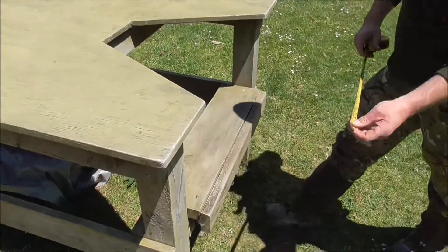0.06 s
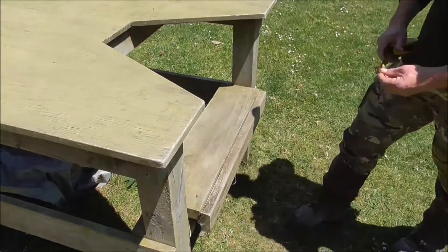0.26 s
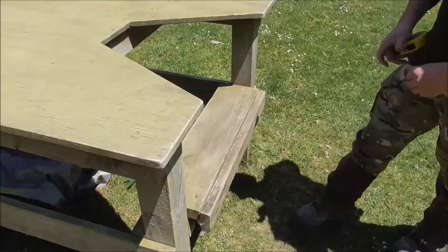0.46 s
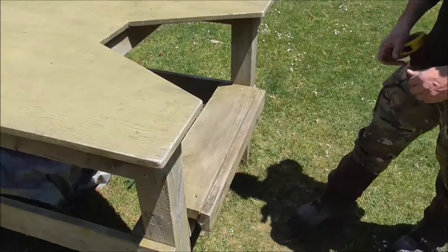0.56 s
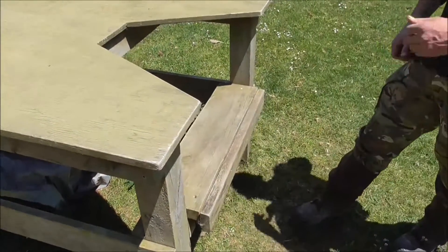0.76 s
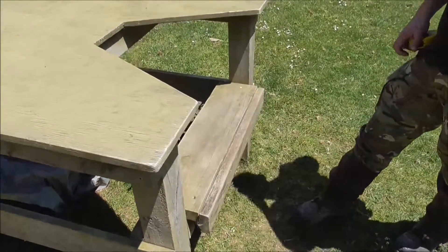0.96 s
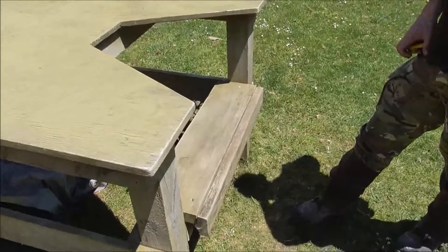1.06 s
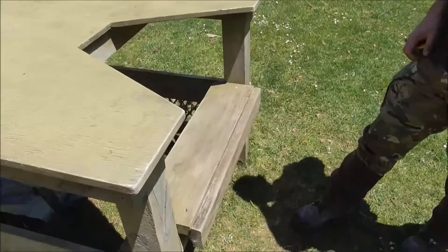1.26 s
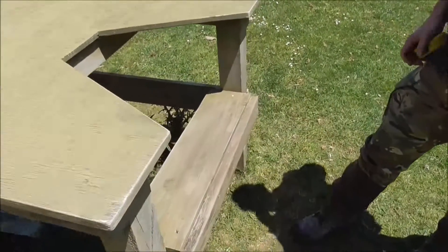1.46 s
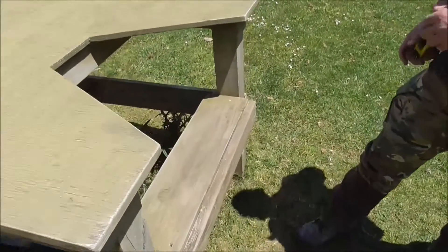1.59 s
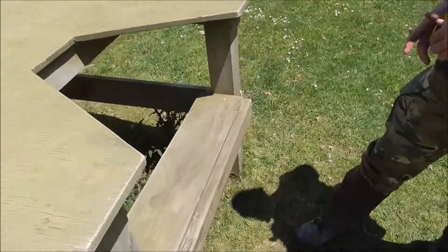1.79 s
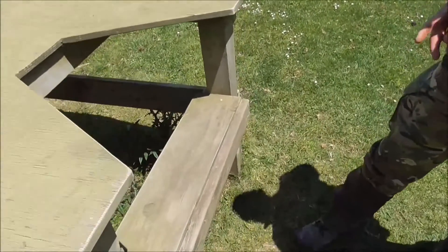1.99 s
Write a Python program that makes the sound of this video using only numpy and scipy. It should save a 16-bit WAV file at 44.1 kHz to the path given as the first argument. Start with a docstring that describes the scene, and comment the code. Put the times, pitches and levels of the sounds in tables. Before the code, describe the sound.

A steel tape measure runs back into its plastic case with gritty hiss and a hollow spool drone, slapping at 0.2 and 0.43 seconds, then snapping home brightly at 0.54. Small dry creaks and clicks of the case follow until about 1.2, then sparse nail clicks, a scuff near 1.9 and faint sleeve rustle. Outdoor wind rumbles and buffets the microphone throughout, stronger after 1.2 seconds, over soft hiss.

```python
"""Gusty wind rumbles and burbles on the microphone outdoors, its main push opposite in the two channels.
A steel tape measure runs back into its plastic case: gritty noise hisses in the slot, resonant noise drones
as the spool, and bursts with ringing modes slap and clack the hook home. Then short noise bursts creak,
click and scuff the case in the hand, and sleeves rustle faintly. A soft outdoor hiss lies underneath."""
import sys
import numpy as np
from scipy import signal
from scipy.fft import rfft, irfft, next_fast_len
from scipy.io import wavfile
from scipy.ndimage import map_coordinates

SR = 44100
rng = np.random.default_rng(int(sys.argv[2]) if len(sys.argv) > 2 else 0)


def int16_out(signal):
    """Quantize to a 16-bit WAV file."""
    q = np.round(np.clip(np.atleast_2d(signal).T, -1, 1) * 32767)
    wavfile.write(sys.argv[1], SR, q.astype(np.int16))


N = 89611
TIME = np.arange(N) / SR  # seconds

# Wind strength. Each row: time in seconds, level in dB.
WIND_LEVEL = [(0, -36), (.08, -41), (.16, -22.5), (.25, -28.5), (.42, -28.5), (.52, -27.5), (.63, -35),
              (.76, -31.5), (.9, -31), (.97, -24.5), (1.06, -22.5), (1.12, -31.5), (1.19, -21.5),
              (1.3, -24.5), (1.41, -20.5), (1.6, -22.5), (1.68, -28), (1.8, -21.5), (2.03, -18)]
# Single buffets. Each row: centre in seconds, level in dB, half width in seconds,
# burble in dB relative to the buffet.
BUFFETS = [(0.275, -20.5, 0.0051, -13), (0.31, -21, 0.0053, -25), (.70, -23.5, 0.0075, -27.5),
           (0.789, -21, .016, -12), (1.157, -26.5, 0.005, -4), (1.27, -18.5, 0.0071, -5),
           (1.325, -19, 0.0076, -7.5), (1.391, -17.5, 0.011, -16), (1.602, -17.5, 0.0046, -18),
           (1.642, -35.5, 0.0037, 8.5), (1.743, -20, 0.01, -10.5), (1.788, -18, 0.0072, -8.5),
           (1.835, -16.5, 0.006, -9.5), (1.951, -15.5, 0.0037, -1), (2.003, -17.5, 0.0081, -4.5)]
# Spectrum of the low rumble. Each row: frequency in Hz, level in dB.
RUMBLE_COLOUR = [(25, -29), (50, -11), (80, -2.5), (130, 1.5), (190, -2), (280, -10), (450, -20),
                 (750, -31), (1100, -50.5), (1800, -72.5), (4000, -89)]
# Spectrum of the higher burble. Each row: frequency in Hz, level in dB.
BURBLE_COLOUR = [(150, -13), (330, 13), (520, 6), (800, -1.5), (1150, -17), (1700, -44), (4000, -67)]
# Hollow bumps at the microphone. Each row: start in seconds, level in dB, relative low thump in dB.
BUMPS = [(1.2185, -22.5, -13), (1.2542, -16.5, 12.5)]
# Upper modes of a bump. Each row: frequency in Hz, relative level in dB, 60 dB decay in seconds.
BUMP_RING = [(626, 9.5, 0.03), (797, 0.5, 0.061)]
# Low modes of a bump. Each row: frequency in Hz, relative level in dB, 60 dB decay in seconds.
BUMP_THUMP = [(144, 1.5, 0.083), (196, 1.5, 0.074)]
WIND_LEFT_DB, WIND_APART_DB = -5, -15  # left channel's share; unshared turbulence in each channel
FLUTTER_DB, FLUTTER_PER_S = 1.5, 44.53
BURBLE_DB, BURBLE_FLUTTER_DB, BURBLE_FLUTTER_PER_S = -18, 8, 70
BUMP_RISE_S = 0.0027

# Spectrum of the outdoor hiss. Each row: frequency in Hz, level in dB.
AIR_COLOUR = [(300, -18.5), (1000, 4), (2100, -16), (3000, -14), (4600, -18.5), (6700, -21), (10000, -19),
              (16000, -16.5)]
AIR_DB = -63

# Blade rubbing in the slot. Each row: time in seconds, level in dB.
BLADE_LEVEL = [(0, -59.5), (.05, -51), (.135, -42.5), (.183, -46.5), (.22, -42), (.28, -43), (.312, -44),
               (.336, -29), (.365, -41.5), (.42, -43), (.445, -37.5), (.465, -48.5), (.527, -42.5),
               (.556, -47), (.585, -54.5), (.635, -75)]
# Spectrum of the rubbing. Each row: frequency in Hz, level in dB.
BLADE_COLOUR = [(400, -10.5), (900, -1.5), (1400, -9), (2150, -4), (2800, -4.5), (3600, -4), (4600, 0.5),
                (5700, -9.5), (7400, -11.5), (8250, -0.5), (10300, 2), (11500, -2), (13500, -10),
                (16000, -26)]
# The turning spool. Each row: time in seconds, level in dB.
SPOOL_LEVEL = [(0, -62.5), (.12, -55), (.18, -47), (.36, -43), (.46, -43.5), (.51, -62.5), (.585, -45),
               (.63, -63)]
# Resonances of the drone. Each row: frequency in Hz, width in Hz, relative level in dB.
SPOOL_MODES = [(482, 95, -4), (542, 67, 7), (724, 110, -6), (900, 150, -12.5), (1150, 120, -13)]
GRIT_PER_S, GRIT_DB = 280, -15
GRAIN_T60_S, GRAIN_SIZE_DB = .004, 3.5  # decay and random spread of the grains
SPOOL_WANDER, SPOOL_WANDER_PER_S = .025, 35  # speed spread as a fraction; curve knots a second

# Sleeve rustle. Each row: time in seconds, level in dB.
CLOTH_LEVEL = [(0, -76), (1.0, -69.5), (1.17, -66), (1.25, -70.5), (1.44, -65.5), (1.58, -59.5),
               (1.65, -59.5), (1.71, -57), (1.88, -57.5), (2.03, -55)]
# Spectrum of the rustle. Each row: frequency in Hz, level in dB.
CLOTH_COLOUR = [(700, 0), (1500, -7), (2200, -8), (2900, -17), (4000, -9), (6300, -16), (9000, -7),
                (11500, -7.5), (16000, -37)]
SNAG_PER_S, SNAG_DB = 70, -7.5

# Blade slaps, then the hook striking the case. Each row: start in seconds, level in dB,
# relative low body in dB, 60 dB decay in seconds.
CLACKS = [(0.0895, -35, -8, 0.044), (0.1946, -17, -9, .012), (0.198, -21, -13.5, 0.034),
          (0.4329, -26, -8, .025), (0.4377, -26, -8.5, .025), (0.536, -30.5, 6.5, .02),
          (0.5395, -9.5, -15.5, .017), (0.5424, -17, -2.5, 0.022)]
# Modes of the steel. Each row: frequency in Hz, relative level in dB, 60 dB decay in seconds.
STEEL_MODES = [(3390, -14, 0.039), (4730, -6, 0.037), (5230, -14, 0.032), (6500, -11.5, 0.029),
               (8360, -18, .022), (8530, 1.5, .022), (9720, -23, 0.011), (9800, 3, 0.018),
               (10600, -17.5, 0.036), (11240, 2.5, .02), (12100, -13.5, .02)]
# Spectrum of the bright crack. Each row: frequency in Hz, level in dB.
CRACK_COLOUR = [(1000, -30.5), (3000, -25.5), (5000, -6), (7400, -12), (8200, -1.5), (10500, 2.5),
                (12500, -11.5), (14000, -14.5), (16000, -28)]
# Spectrum of the duller plastic rattle. Each row: frequency in Hz, level in dB.
BODY_COLOUR = [(150, -9), (500, -0.5), (950, 1), (1400, -3.5), (2100, 0.5), (3000, -1.5), (4600, 4.5),
               (5600, -7.5), (6800, -15), (12000, -32.5)]
# Modes of the whole case. Each row: frequency in Hz, relative level in dB, 60 dB decay in seconds.
CASE_MODES = [(290, -4, 0.031), (530, 5, 0.037), (730, -5.5, 0.032), (830, -8.5, .022), (880, -7, 0.036),
              (1163, -2.5, .025), (1720, -17, 0.044), (2170, -6.5, .02), (2240, -2, .02)]
STOP_S, STOP_DB = .5460, -28.5  # the stop knocks the whole case
RING_DB, CRACK_DB, CLACK_RISE_S = -3, -1.5, 0.00033

# The case rattling and creaking in the hand. Each row: start in seconds, level in dB,
# relative upper middle in dB, relative treble in dB.
TICKS = [(0.5692, -39.5, 0.5, -20), (0.5792, -48, 0.5, -6.5), (.5885, -43, 2.5, -13),
         (0.6035, -46.5, 3, -10), (.640, -59, -1.5, -5), (0.7686, -40, -17, -25),
         (0.8435, -44.5, -8.5, -19), (.8631, -55.5, -3, -16), (0.882, -48, -2, -14), (0.9144, -44, -2, -11),
         (0.925, -47, 5, -18), (0.94, -44.5, -5, -9.5), (0.949, -45, 2.5, -21), (0.9695, -43, -1.5, -10),
         (0.985, -42, -13, -26), (1.155, -55.5, -5.5, -4.5), (1.1751, -51, -12, -14),
         (1.4873, -45, -8.5, -18)]
# Spectrum of a tick's dull part. Each row: frequency in Hz, level in dB.
TICK_COLOUR = [(300, -4), (900, 10.5), (1400, 3), (2200, 3), (3000, -8.5), (4200, -21), (8000, -32),
               (15000, -49)]
# Spectrum of a tick's upper middle. Each row: frequency in Hz, level in dB.
TICK_UPPER_COLOUR = [(1500, -14), (2800, 0.5), (3900, 5), (5000, -6.5), (6300, -15), (9000, -25),
                     (15000, -28.5)]
# Light fingernail clicks on the case. Each row: start in seconds, level in dB.
NAILS = [(1.3125, -55.5), (1.4792, -48), (1.581, -53)]
# Spectrum of a nail click. Each row: frequency in Hz, level in dB.
NAIL_COLOUR = [(1500, -26), (3000, -23), (4200, -10), (5600, -4), (7000, -9), (10000, -12), (15000, -22)]
# Short scuffs of the hand on the case. Each row: centre in seconds, level in dB, half width in seconds.
SCUFFS = [(1.585, -55.5, 0.0126), (1.700, -51.5, .002), (1.9085, -44, 0.0041), (1.9165, -37.5, 0.0055)]
# Spectrum of a scuff. Each row: frequency in Hz, level in dB.
SCUFF_COLOUR = [(400, 4), (1000, -0.5), (2100, -7), (2900, -9), (3800, -2), (5400, -12), (7000, -17),
                (9500, -9), (15000, -22.5)]
# Fingers rubbing on the case. Each row: centre in seconds, level in dB, half width in seconds.
RUBS = [(1.175, -57.5, 0.013), (1.53, -58, 0.0033), (1.578, -57, 0.021), (1.82, -54, 0.0071),
        (2.012, -52, 0.0078)]
# Spectrum of a rub. Each row: frequency in Hz, level in dB.
RUB_COLOUR = [(600, -11), (1150, 4), (1400, 5.5), (1700, -3), (2400, -16), (6000, -29), (15000, -36)]
TICK_T60_S, TICK_RISE_S, NAIL_T60_S = .022, .0003, 0.0205

# Stereo balance of the tape measure. Each row: frequency in Hz, left minus right in dB.
TAPE_BALANCE = [(300, 0), (1200, 2), (2400, -0.3), (4400, -1.8), (8200, 2.7), (11000, 2), (14000, 8)]
LEFT_LAG_S = 1.7e-5
SCATTER_DB, SCATTER_T60_S = -14.5, 0.021
SPREAD_DB = -14
TOP_HZ = 16000


def amp(db):
    """Decibels to gain."""
    return 10 ** (np.asarray(db) / 20)


def unit(x):
    """Scale to rms 1."""
    return x / np.sqrt(np.mean(x ** 2) + 1e-20)


def along(points, hz):
    """Read (Hz, value) points on a log frequency axis."""
    f, v = np.transpose(points)
    return np.interp(np.log(hz + 1), np.log(f + 1), v)


def level(points):
    """Gain per sample from (s, dB) points."""
    return amp(np.interp(TIME, *np.transpose(points)))


def wobble(rate):
    """A smooth random curve through rate knots a second."""
    knots = rng.standard_normal(int(N * rate / SR) + 4)
    return map_coordinates(knots, [TIME * rate])


def filtered(x, response):
    """Shape the spectrum of x by a complex response of frequency."""
    m = next_fast_len(N + SR // 2)
    spectrum = rfft(x, m) * response(np.fft.rfftfreq(m, 1 / SR))
    return irfft(spectrum, m)[..., :N]


def noise(colour, grain_db=0):
    """Coloured noise of rms 1, bunched into tiny grains where grain_db is above 0."""
    white = rng.standard_normal(N) * amp(grain_db * wobble(1500))
    return unit(filtered(white, lambda hz: amp(along(colour, hz))))


def strike(s, t60, rise):
    """Envelope of a blow at time s: a quick rise and an exponential decay."""
    t = np.maximum(TIME - s, 0)
    return (1 - np.exp(-t / rise)) * np.exp(-np.log(1000) * t / t60)


def ring(modes, s, rise):
    """Decaying sine modes struck at time s, with random level and phase each time."""
    chance = rng.standard_normal((len(modes), 2))
    out = 0
    for (hz, db, t60), (more_db, cycles) in zip(modes, chance):
        tone = np.sin(2 * np.pi * (hz * (TIME - s) + cycles))
        out = out + amp(db + more_db) * strike(s, t60, rise) * tone
    return out


def swells(rows):
    """Bell-shaped envelopes from (s, dB, half width s) rows."""
    return sum(amp(db) * np.exp(-.5 * ((TIME - s) / width) ** 2) for s, db, width in rows)


def turbulence(strength, colour):
    """Noise of changing strength, coloured afterwards by the microphone."""
    push = strength * rng.standard_normal(N)
    return np.std(push) * unit(filtered(push, lambda hz: amp(along(colour, hz))))


def wind():
    """Fluttering rumble and burble with buffets and bumps, opposite in sign in the two channels."""
    flow = level(WIND_LEVEL) * unit(amp(FLUTTER_DB * wobble(FLUTTER_PER_S)))
    low = flow + swells([(s, db, width) for s, db, width, _ in BUFFETS])
    burble_flutter = unit(amp(BURBLE_FLUTTER_DB * wobble(BURBLE_FLUTTER_PER_S)))
    burble_buffets = swells([(s, db + burble_db, width) for s, db, width, burble_db in BUFFETS])
    high = amp(BURBLE_DB) * flow * burble_flutter + burble_buffets
    bumps = 0
    for s, db, thump_db in BUMPS:
        hollow = ring(BUMP_RING, s, BUMP_RISE_S)
        thump = amp(thump_db) * ring(BUMP_THUMP, s, BUMP_RISE_S)
        bumps = bumps + amp(db) * (hollow + thump)
    shared = turbulence(low, RUMBLE_COLOUR) + turbulence(high, BURBLE_COLOUR) + bumps
    # independent turbulence in each channel
    apart = np.array([turbulence(flow, RUMBLE_COLOUR), turbulence(flow, RUMBLE_COLOUR)])
    return np.array([-amp(WIND_LEFT_DB) * shared, shared]) + amp(WIND_APART_DB) * apart


def outdoor_air():
    """Faint steady hiss of coloured noise, independent in each channel."""
    return amp(AIR_DB) * np.array([noise(AIR_COLOUR), noise(AIR_COLOUR)])


def grains(per_s, colour):
    """Sparse decaying noise ticks at random times and of uneven size, rms 1 overall."""
    hits = (rng.random(N) < per_s / SR) * amp(GRAIN_SIZE_DB * rng.standard_normal(N))
    decay = np.exp(-np.log(1000) / (GRAIN_T60_S * SR))
    envelope = signal.lfilter([1], [1, -decay], hits)
    return unit(envelope * noise(colour))


def spool_response(hz):
    """Sum of band resonances with alternating sign, for the hollow drone in the case."""
    out = 0
    for k, (centre, width, db) in enumerate(SPOOL_MODES):
        band = 1j * hz * width / (centre * centre - hz * hz + 1j * hz * width)
        out = out + (-1) ** k * amp(db) * band
    return out


def blade():
    """Gritty hiss of the blade in the slot, over the drone of a spool turning at unsteady speed."""
    rub = noise(BLADE_COLOUR, grain_db=1.0)
    grit = amp(GRIT_DB) * grains(GRIT_PER_S, BLADE_COLOUR)
    speed = 1 + SPOOL_WANDER * wobble(SPOOL_WANDER_PER_S)
    steady_drone = unit(filtered(rng.standard_normal(N), spool_response))
    drone = map_coordinates(steady_drone, [np.cumsum(speed)])  # read through at the varying speed
    return level(BLADE_LEVEL) * (rub + grit) + level(SPOOL_LEVEL) * drone


def sleeves():
    """Faint rustle of coloured noise with small snags as the arms move."""
    rustle = noise(CLOTH_COLOUR, grain_db=1)
    snags = amp(SNAG_DB) * grains(SNAG_PER_S, CLOTH_COLOUR)
    return level(CLOTH_LEVEL) * (rustle + snags)


def clacks():
    """Each blow is a bright crack, a brief steel ring and a duller plastic rattle; the stop rings the case."""
    crack, body = noise(CRACK_COLOUR), noise(BODY_COLOUR)
    out = amp(STOP_DB) * ring(CASE_MODES, STOP_S, CLACK_RISE_S)
    for s, db, body_db, t60 in CLACKS:
        burst = strike(s, t60, CLACK_RISE_S) * (amp(CRACK_DB) * crack + amp(body_db) * body)
        steel = .5 * amp(RING_DB) * ring(STEEL_MODES, s, CLACK_RISE_S)
        out = out + amp(db) * (burst + steel)
    return out


def handling():
    """Dry creaks and nail clicks as decaying noise; scuffs and rubs of the case as noise swells."""
    dull = noise(TICK_COLOUR, grain_db=4.5)
    upper = noise(TICK_UPPER_COLOUR, grain_db=6)
    treble = noise(CRACK_COLOUR)
    ticks = 0
    for s, db, upper_db, treble_db in TICKS:
        mix = dull + amp(upper_db) * upper + amp(treble_db) * treble
        ticks = ticks + amp(db) * strike(s, TICK_T60_S, TICK_RISE_S) * mix
    nail_envelope = sum(amp(db) * strike(s, NAIL_T60_S, TICK_RISE_S) for s, db in NAILS)
    nails = nail_envelope * noise(NAIL_COLOUR)
    scuffs = swells(SCUFFS) * noise(SCUFF_COLOUR, grain_db=2)
    rubs = swells(RUBS) * noise(RUB_COLOUR)
    return ticks + nails + scuffs + rubs


def tape_measure():
    """Everything that sounds at the hands."""
    return blade() + clacks() + handling() + sleeves()


def place(x):
    """Stereo by balance and a slight left lag, with a short random scatter that differs between channels."""
    t = TIME[:SR // 8]
    tail = rng.standard_normal((2, len(t))) * np.exp(-np.log(1000) * t / SCATTER_T60_S)
    tail = tail / np.linalg.norm(tail[0])
    scatter = signal.fftconvolve(x[None], tail, axes=1)[:, :N]
    sides = np.array([[.5], [-.5]])  # each channel takes half of the balance and lag

    def side_response(hz):
        """Level and delay of each channel."""
        lag = np.exp(-2j * np.pi * hz * sides * LEFT_LAG_S)
        return amp(sides * along(TAPE_BALANCE, hz)) * lag

    return filtered(x + amp(SCATTER_DB) * scatter, side_response)


def scene():
    """Wind over a faint outdoor hiss, and the tape measure slightly spread between the channels."""
    air = outdoor_air()
    gusts = wind()
    direct = place(tape_measure())
    spread = amp(SPREAD_DB) * tape_measure()  # fresh noise at the same times, opposite in the channels
    return direct + np.array([spread, -spread]) + gusts + air


def record(dry):
    """Nothing passes from the band limit up."""
    return filtered(dry, lambda hz: hz < TOP_HZ)


dry = scene()
out = record(dry)
int16_out(out)
```